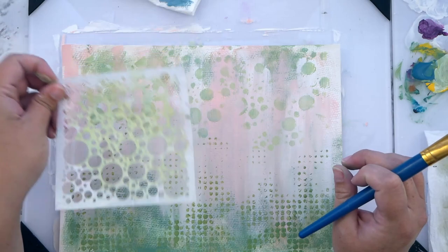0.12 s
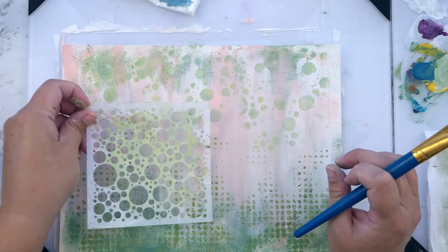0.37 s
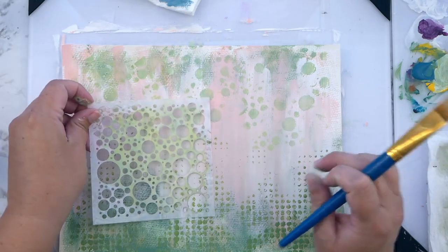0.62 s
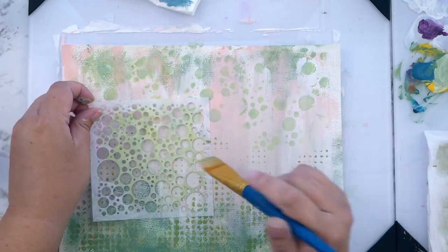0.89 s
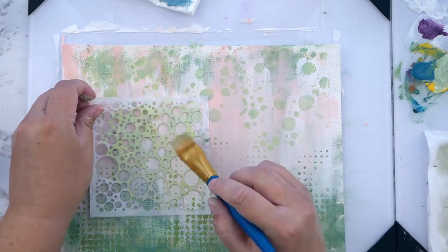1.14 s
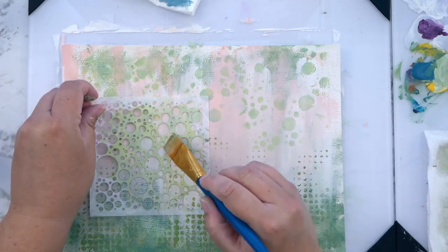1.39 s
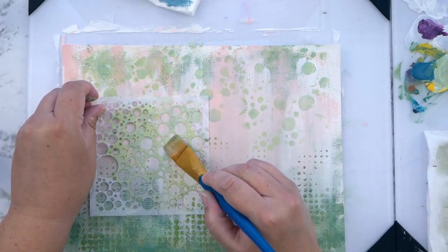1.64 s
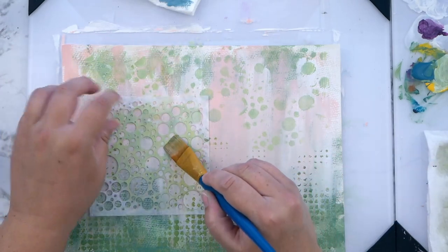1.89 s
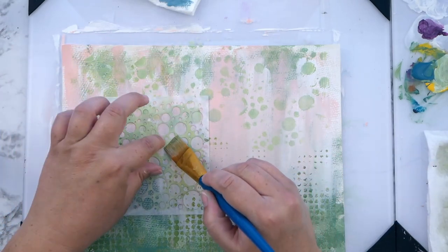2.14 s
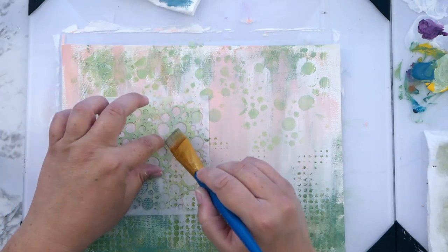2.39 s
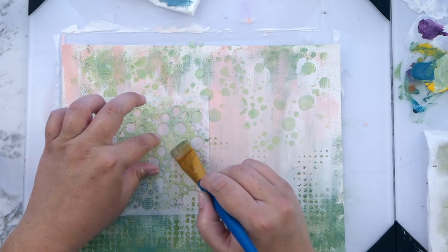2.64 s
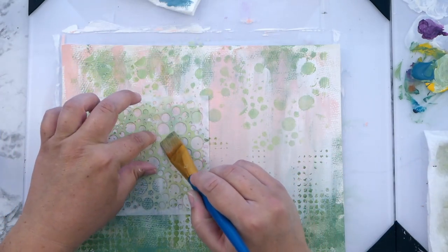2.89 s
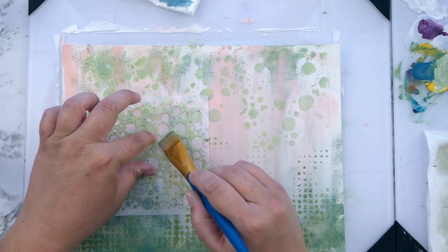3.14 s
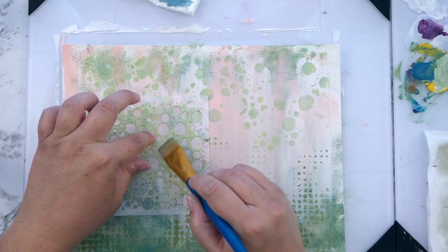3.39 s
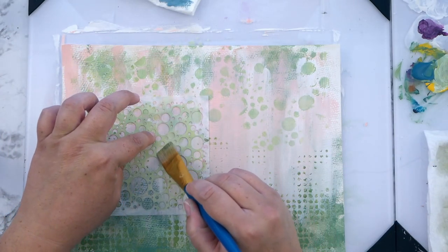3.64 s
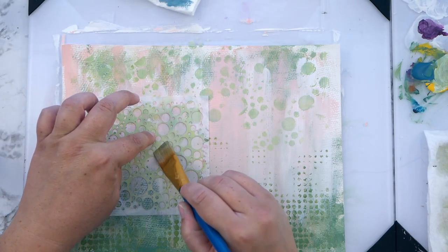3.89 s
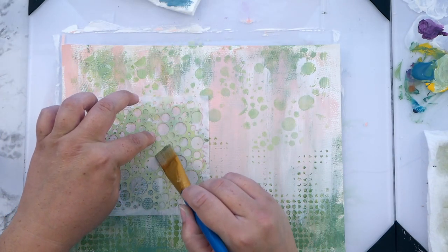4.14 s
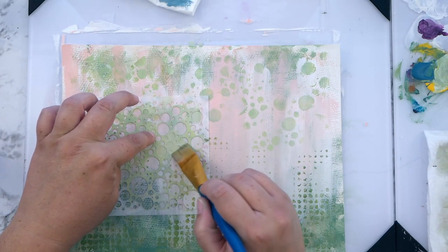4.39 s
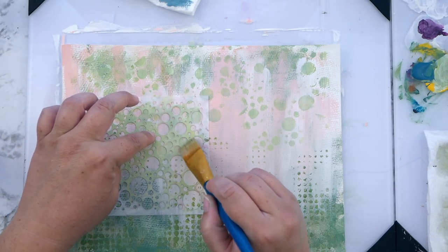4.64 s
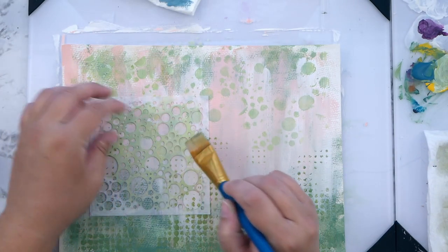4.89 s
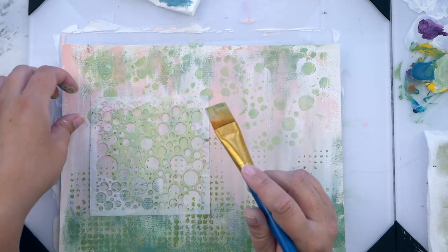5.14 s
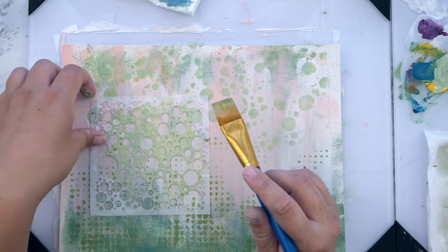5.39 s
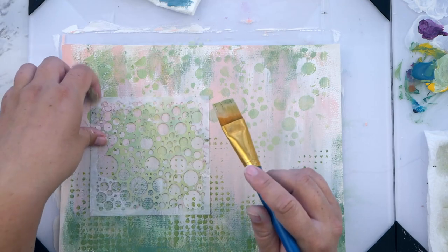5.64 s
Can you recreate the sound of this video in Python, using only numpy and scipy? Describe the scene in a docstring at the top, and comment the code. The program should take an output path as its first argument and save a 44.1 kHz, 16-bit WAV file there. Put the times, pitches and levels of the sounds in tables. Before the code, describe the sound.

Low appliance hum and rushing air indoors, a soft table knock, then a flat brush faintly dabs a plastic stencil with small crisp ticks.

```python
"""A motor hums and whines over the rumble of moving air while hands slide a sheet; something knocks once.
Then a flat brush dabs paint through a thin plastic stencil lying on paper on the table.
Air and bristle rustle are coloured noise, the motor is sines, the knock rings table modes,
and the tacky sheet ticks in short band-passed bursts as it lifts and drops. The near sounds echo in a room."""
import sys
import numpy as np
from scipy import signal
from scipy.fft import rfft, irfft
from scipy.io import wavfile

SR = 44100
rng = np.random.default_rng(int(sys.argv[2]) if len(sys.argv) > 2 else 0)


def file_out(sig):
    """Save sig as 16-bit WAV at sys.argv[1]."""
    # one column per channel
    cols = np.atleast_2d(sig).T
    # limit, then scale
    lim = np.clip(cols, -1, 1)
    pcm = np.round(lim * 32767).astype(np.int16)
    wavfile.write(sys.argv[1], SR, pcm)


def volts_from_decibels(level):
    """Turn decibel levels (scalar or array-like) into linear amplitude factors."""
    exponent = np.asarray(level, float) / 20
    return 10 ** exponent


N = 254567   # length of the sound in samples


def rms_one(x):
    """Scales to rms 1."""
    return x / np.sqrt(np.mean(x ** 2) + 1e-20)


def in_time(rows):
    """Turns the columns of a table into curves, one value a sample; the first column is time."""
    s, *columns = np.transpose(rows)
    t = np.arange(N) / SR
    return [np.interp(t, s, column) for column in columns]


def bin_hz():
    """Frequencies of the transform of the whole sound, kept at 1 Hz or more for the logarithm."""
    return np.maximum(np.fft.rfftfreq(N, 1 / SR), 1)


def gain_at(points):
    """Turns a (frequency [Hz], level [dB]) table into a gain on every frequency."""
    hz, db = np.transpose(points)
    return volts_from_decibels(np.interp(np.log(bin_hz()), np.log(hz), db))


def shaped(x, gain):
    """Colours a steady noise."""
    return irfft(rfft(x) * gain, N)


def band(x, low_hz, high_hz, order):
    """Band-pass."""
    edges = [low_hz, min(high_hz, .45 * SR)]
    return signal.sosfilt(signal.butter(order, edges, "band", fs=SR, output="sos"), x)


def drift(rate_hz):
    """Slow random wander of rms 1: noise through a two-pole low-pass at rate_hz."""
    every = 40   # samples between computed points
    r = np.exp(-2 * np.pi * rate_hz * every / SR)
    noise = rng.standard_normal(N // every + 2002)
    slow = signal.lfilter([1], [1, -2 * r, r * r], noise)[2000:]   # skips the filter's start
    return np.interp(np.arange(N) / every, np.arange(len(slow)), rms_one(slow))


def ring(clicks, hz, t60_s):
    """A resonance: a unit click sets off a decaying sine that starts at height 1."""
    r = volts_from_decibels(-60 / (t60_s * SR))
    w = 2 * np.pi * hz / SR
    return signal.lfilter([0, np.sin(w)], [1, -2 * r * np.cos(w), r * r], clicks + 1e-18)


def stroke(end_s, length_s, growth_db, rise, fall):
    """Level [dB] against the end level: a rise, steady growth over the length, a fall (both [dB/s])."""
    t = np.arange(N) / SR - end_s
    growth = growth_db * np.clip(t / length_s, -1, 0)
    return growth + rise * np.minimum(t + length_s, 0) - fall * np.maximum(t, 0)


AIR_DB = -42.5   # rms of the middle signal
# spectrum of air and room noise: (frequency [Hz], relative level [dB per Hz])
AIR_SPECTRUM = [(6, -28), (13, -4.5), (19, 8), (24, -3.5), (33, -9), (48, -10.5), (85, -15), (103, -8.5),
                (116, -3.5), (124, -13), (135, -10.5), (190, -15), (300, -14.5), (404, -20.5), (610, -29.5),
                (720, -26), (1150, -33), (1500, -32), (2690, -42), (4000, -44.5), (7230, -47.5),
                (11000, -52.5), (15600, -60)]
# resonances of ducts and room: (frequency [Hz], width [Hz], level over the noise [dB])
DUCT_RESONANCES = [(62.5, 9.8, 5), (163.1, 15.3, 9), (205.2, 7.2, 10), (560, 20, 2), (872, 9.4, 2.5),
                   (1557, 33, 5), (2440, 89, -2.5)]
# stereo width of air and echoes: (frequency [Hz], side minus mid [dB])
STEREO_WIDTH = [(25, -43), (60, -36), (110, -40), (200, -45.5), (380, -29.5), (700, -20.5), (1290, -20),
                (2380, -13.5), (4400, -9), (8120, -6.5), (15000, -2)]


def air():
    """Moving air is smooth noise with a few resonances; the sides differ little, more in the treble."""
    colour = gain_at(AIR_SPECTRUM)
    for hz, width_hz, db in DUCT_RESONANCES:
        colour = colour * volts_from_decibels(db / (1 + (2 * (bin_hz() - hz) / width_hz) ** 2))
    mid, side = rng.standard_normal((2, N))
    mid = shaped(mid, colour)
    side = shaped(side, colour * gain_at(STEREO_WIDTH))
    scale = volts_from_decibels(AIR_DB) / np.sqrt(np.mean(colour ** 2))
    return scale * (mid + side * [[1], [-1]])


def tone(hz, db, waver_db):
    """A sine on a pitch curve, its level wavering a little around an rms of db."""
    phase = 2 * np.pi * np.cumsum(hz) / SR
    return np.sqrt(2) * volts_from_decibels(db + waver_db * drift(12.0)) * np.sin(phase)


WHINE_HZ, WHINE_WANDER_HZ = 1267.1, .7
WHINE_DB = -65.5   # rms, halfway between the levels left and right
UPPER_WHINE_HZ, UPPER_WHINE_DB = 44.6, -12   # a fainter line, given relative to the whine
IN_STEP_S = 5.36   # a moment when the two hums add up
# rotor hum and mains hum: (frequency [Hz], rms level [dB])
MOTOR_HUMS = [(116.37, -39), (119.97, -54.7)]


def motor():
    """Two steady hums beat against each other; two thin whines wander together, a little to the right."""
    t = np.arange(N) / SR - IN_STEP_S
    hum = sum(np.sqrt(2) * volts_from_decibels(db) * np.cos(2 * np.pi * hz * t) for hz, db in MOTOR_HUMS)
    whine_hz = WHINE_HZ + WHINE_WANDER_HZ * drift(0.617)
    whine = tone(whine_hz, WHINE_DB, waver_db=1.4)
    upper = tone(whine_hz + UPPER_WHINE_HZ, WHINE_DB + UPPER_WHINE_DB, waver_db=2.5)
    return hum + (whine + upper) * volts_from_decibels([[-.6], [.6]])   # dB left, dB right


ROOM_T60_S, ROOM_DB, WALL_CUT_HZ = 0.17, -10.5, 3700


def room(x):
    """Diffuse echoes: dying noise tails for the middle and the side, dulled by the walls."""
    t = np.arange(SR // 2) / SR
    tail = rng.standard_normal((2, len(t))) * volts_from_decibels(-60 * t / ROOM_T60_S)
    tail = tail * (t > .004)   # no echo before 4 ms
    dull = signal.lfilter(*signal.butter(1, WALL_CUT_HZ, fs=SR), tail)
    dull = dull / np.sqrt(np.sum(dull[0] ** 2))
    mid, side = signal.fftconvolve(x[None], dull, axes=1)[:, :N]
    # close microphones hear much the same echoes, less alike in the treble
    side = volts_from_decibels(-0.5) * shaped(side, gain_at(STEREO_WIDTH))
    return volts_from_decibels(ROOM_DB) * (mid + side * [[1], [-1]])


SETTLE_S, SETTLE_LENGTH_S, SETTLE_DB = 0.305, 0.055, -50.5   # start, length and starting level
SETTLE_RISE_DB_PER_S, SETTLE_SAG_DB, SETTLE_FALL_DB_PER_S = 900, 9, 450
BOUNCE_S, BOUNCE_DB = 0.0225, 2.5   # period, swing up and down


def settling():
    """The sheet settles after the knock: a sagging level that bounces and wavers."""
    end_s = SETTLE_S + SETTLE_LENGTH_S
    shape = stroke(end_s, SETTLE_LENGTH_S, -SETTLE_SAG_DB, SETTLE_RISE_DB_PER_S, SETTLE_FALL_DB_PER_S)
    t = np.arange(N) / SR - SETTLE_S + 0.0026
    bounce = BOUNCE_DB * np.sin(2 * np.pi * t / BOUNCE_S)
    return volts_from_decibels(SETTLE_DB - SETTLE_SAG_DB + shape + bounce + 0.8 * drift(60))


KNOCK_S, KNOCK_DB = .2672, -33
CONTACT_HZ = 3260   # the soft contact dulls what lies above
# modes of the table before the contact dulls them:
# (frequency [Hz], level against the blow [dB], t60 [s], murmur against the settling level [dB])
TABLE_MODES = [(70.4, 1, 0.074, -10), (200, 1, 0.061, -10), (350, -6, 0.033, -11), (846, -9, 0.037, 1.5),
               (1440, -18, 0.015, -7.5), (1700, -6, 0.015, -8), (2040, 0.5, .016, -6),
               (2330, -5.5, 0.0099, -21), (3030, -7.5, 0.011, -24)]


def knock():
    """One soft-edged blow rings the table; the settling sheet keeps its modes murmuring in lumps."""
    blow = np.zeros(N)
    blow[round(KNOCK_S * SR)] = volts_from_decibels(KNOCK_DB)
    settle = settling()
    out = np.zeros(N)
    for k, (hz, db, t60_s, murmur_db) in enumerate(TABLE_MODES):
        out += (-1) ** k * volts_from_decibels(db) * ring(blow, hz, t60_s)
        murmur = rms_one(ring(rng.standard_normal(N), hz, 0.81 * t60_s))   # decays sooner than the knock
        out += volts_from_decibels(murmur_db) * murmur * settle
    return signal.sosfilt(signal.butter(4, CONTACT_HZ, fs=SR, output="sos"), out)


SCRAPE_RISE_DB_PER_S, SCRAPE_FALL_DB_PER_S = 402, 264   # shared by rasps and scuffs
RASP_CYCLES = 47   # the resonance dies by 60 dB in this many cycles
# short narrow rasps, perhaps an edge dragging: (end time [s], level [dB], length [s], frequency [Hz])
RASP_STROKES = [(1.104, -70, .025, 10100), (1.167, -77, 0.027, 10100), (4.25, -70.5, .02, 2270),
                (4.86, -65, 0.032, 2240)]


def rasps():
    """Noise through one narrow resonance, in short strokes."""
    noise = rng.standard_normal(N)
    out = np.zeros(N)
    for end_s, db, length_s, hz in RASP_STROKES:
        level = volts_from_decibels(db + stroke(end_s, length_s, 0, SCRAPE_RISE_DB_PER_S, SCRAPE_FALL_DB_PER_S))
        out += level * rms_one(ring(noise, hz, RASP_CYCLES / hz))
    return out


def faint_ticks():
    """Each dab frees the sheet once more, at a chance moment, level and pitch; rows as for the ticks."""
    rows = []
    for lift_s, length_s, *_ in DAB_STROKES:
        a, b, c = rng.random(3)
        peak_db = -57 + 4.3 * (b - .5)
        centre_hz = 6500 * (0.9 + .4 * c)
        rows.append((lift_s - length_s * a, peak_db, centre_hz, -15, 1.5))
    return rows


SLAP_LOW_HZ, SLAP_HIGH_HZ = 1600, 3100   # band of the dull slap of sheet on paper
# ticks of the tacky sheet:
# (time [s], peak level [dB], centre [Hz], dull part against the peak [dB], length [ms])
SHEET_TICKS = [(.5066, -43.5, 4300, -2, 1.6), (1.1987, -46, 10000, -20, 1.4), (1.7918, -51, 5500, -12, 3.4),
               (1.8078, -31, 6050, -15, 1.45), (1.8107, -41.5, 6200, 1, 1.26), (1.8563, -44, 6200, -20, 2),
               (1.8826, -35, 4660, -14, 1.92), (1.8975, -34, 6600, -14, .89),
               (1.9012, -31.5, 5460, -2, 1.1), (1.9039, -27.5, 5500, -1, 2.2), (1.907, -45, 8000, -13, 5.7),
               (1.9154, -52, 4960, 8, 1.1), (2.2657, -48, 7000, -18, 1.8), (2.283, -42, 6060, -20, 2.1),
               (2.642, -50, 6300, -3, 1.5), (2.8559, -52, 7000, -17, 2.3), (3.053, -48, 5860, -19, 1.5),
               (3.1894, -52, 7200, -15, 2.1), (3.3408, -48, 6000, -15, 1.3), (3.5604, -45, 6240, -15, 1.3),
               (3.5724, -48, 6000, -15, 0.93), (3.809, -53, 4600, -8, 1.3), (3.901, -48, 6050, -17, 1.7),
               (4.044, -48, 6500, -15, 1.5), (4.45, -50, 8500, -15, 1.5), (4.7765, -53, 6000, 2, 1.9),
               (4.791, -47, 6200, -13, 1.5), (4.8607, -46, 5560, -10, 1.5), (5.019, -49, 8000, -7, 2),
               (5.592, -47, 5340, -17, 1.7), (5.6521, -54, 9300, -20, 1.46), (5.763, -45, 5030, -7.5, 2.2)]


def ticks(narrowest=1.12, widening=0.015, air_db=-12, air_hz=12500, snap=5.8):
    """Each tick is a snap amid a crackle: its own band, a little air above, a duller slap on the paper."""
    out = np.zeros(N + 1024)
    t = np.arange(1024) / SR
    for s, db, hz, dull_db, ms in SHEET_TICKS + faint_ticks():
        rise_s = max(ms, .2) / 2000   # half the tick's length
        burst = rng.standard_normal(1024) * t / rise_s * np.exp(1 - t / rise_s)   # swells and dies
        burst[round(rise_s * SR)] += snap
        spread = narrowest + widening * max(db + 53, 0)   # a harder tick is sharper and so broader
        bright = band(burst, hz / spread, hz * spread, order=2)
        bright = bright + volts_from_decibels(air_db) * band(burst, hz, max(air_hz, 1.7 * hz), order=1)
        slap = band(burst, SLAP_LOW_HZ, SLAP_HIGH_HZ, order=3)
        tick = bright / np.abs(bright).max() + volts_from_decibels(dull_db) * slap / np.abs(slap).max()
        at = round(s * SR)
        out[at:at + 1024] += volts_from_decibels(db) * tick
    return out[:N]


# hands slide the sheet into place, later let go of it:
# (time [s], sheet rustle level [dB], fine hiss level [dB], paper scuff level [dB])
HAND_LEVELS = [(0, -63, -83, -85), (.1, -78, -77, -83), (.26, -64, -73, -80), (.38, -68, -84, -74),
               (.5, -64, -80, -82), (.72, -63.5, -76, -74), (.81, -61, -67, -63), (.9, -67, -73, -69),
               (1.02, -69.5, -77, -76), (1.3, -85, -83, -85), (1.7, -84, -90, -77), (2.0, -69, -82, -75),
               (2.15, -75, -84, -88), (5.1, -78, -86, -78), (5.2, -64, -68, -67), (5.3, -69, -74, -70),
               (5.5, -78, -86, -74)]


def hands():
    """Power of sheet rustle, fine hiss and paper scuff as the hands move the sheet."""
    return volts_from_decibels(np.array(in_time(HAND_LEVELS))) ** 2


# the sheet scuffs the paper briefly: (end time [s], level [dB], length [s])
PAPER_SCUFFS = [(1.83, -61, 0.024), (1.95, -63, 0.072), (4.79, -74, .02), (4.854, -67, .015)]


def scuffs():
    """Power of the paper noise in short even strokes."""
    return sum(volts_from_decibels(db + stroke(end_s, length_s, 0, SCRAPE_RISE_DB_PER_S, SCRAPE_FALL_DB_PER_S)) ** 2
               for end_s, db, length_s in PAPER_SCUFFS)


LAND_DB_PER_S, PRESS_DB, LIFT_DB_PER_S = 264, 4.5, 402   # rise on landing, growth while pressed, fall
# dabs of the brush, levels as it lifts:
# (lift time [s], length [s], sheet rustle level [dB], fine hiss level [dB])
DAB_STROKES = [(1.753, .02, -63, -74), (2.29, .06, -64.5, -69), (2.473, .02, -65, -67),
               (2.685, 0.14, -67, -70), (3.05, .13, -68, -71), (3.33, 0.13, -66.5, -71),
               (3.555, 0.058, -64.5, -67), (3.785, 0.036, -65, -70), (4.033, .1, -66.5, -70),
               (4.253, .05, -64, -68), (4.465, .05, -62, -66), (4.645, .02, -66, -71),
               (4.86, .08, -67, -70), (5.018, 0.013, -63, -64)]


def dabs():
    """Power of rustle and hiss: the tips land, rub harder while pressed, then lift."""
    body, fine = np.zeros((2, N))
    for lift_s, length_s, body_db, fine_db in DAB_STROKES:
        shape = stroke(lift_s, length_s, PRESS_DB, LAND_DB_PER_S, LIFT_DB_PER_S)
        body += volts_from_decibels(body_db + shape) ** 2
        fine += volts_from_decibels(fine_db + shape) ** 2
    return body, fine


def slips(per_s, spread_db, smooth):
    """Stick-slip grain: dense tiny clicks of uneven size over a smooth hiss."""
    sizes = volts_from_decibels(spread_db * np.minimum(rng.exponential(1, N), 3))
    clicks = sizes * rng.choice([-1, 1], N) * (rng.random(N) < per_s / SR)
    return rms_one(clicks) + smooth * rng.standard_normal(N)


# colour of the sheet rustle: (frequency [Hz], relative level [dB per Hz])
RUSTLE_COLOUR = [(2000, -4), (3500, -11), (5000, -8), (6800, -4.5), (9500, -9.5), (13000, -26)]
# colour of the fine hiss: (frequency [Hz], relative level [dB per Hz])
HISS_COLOUR = [(5000, -15), (9000, -0.5), (11500, 3), (14500, 0), (16000, -2)]
# colour of the paper scuff: (frequency [Hz], relative level [dB per Hz])
PAPER_COLOUR = [(1200, -9), (1800, -9), (2300, -7), (2900, -4), (4500, -12.5)]


def rubbing():
    """Bristle tips slip on the sheet, on each other and on the paper, each with its own colour."""
    hand_body, hand_fine, hand_paper = hands()
    dab_body, dab_fine = dabs()
    powers = (hand_body + dab_body, hand_fine + dab_fine, hand_paper + scuffs())
    out = np.zeros(N)
    for power, colour in zip(powers, (RUSTLE_COLOUR, HISS_COLOUR, PAPER_COLOUR)):
        grain = slips(per_s=900, spread_db=3.0, smooth=0.85)
        flutter = volts_from_decibels(1.9 * drift(39))
        out += np.sqrt(power) * flutter * rms_one(shaped(grain, gain_at(colour)))
    return out


def scene():
    """Hands, brush and sheet close by with their echoes, the appliance all round."""
    near = ticks() + knock() + rubbing() + rasps()
    return near + room(near) + motor() + air()


def top_cut(x):
    """Nothing passes above 16310 Hz."""
    return signal.sosfilt(signal.butter(12, 16310, fs=SR, output="sos"), x)


def record(dry):
    """A steep low-pass cuts the top at 15750 Hz."""
    low_pass = signal.ellip(10, .3, 70, 15750, fs=SR, output="sos")
    finished = signal.sosfilt(low_pass, dry)
    return top_cut(finished)


dry = scene()
out = record(dry)
file_out(out)
```